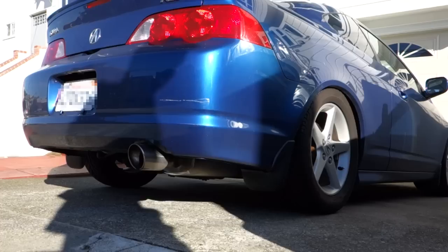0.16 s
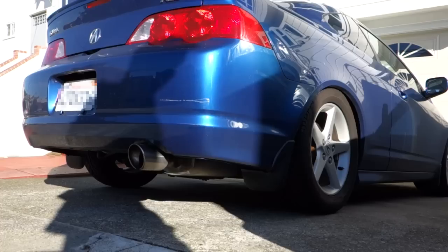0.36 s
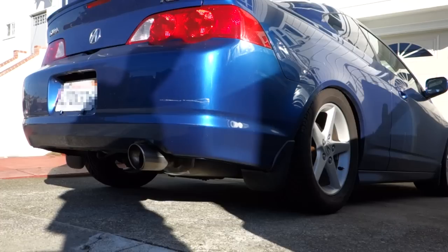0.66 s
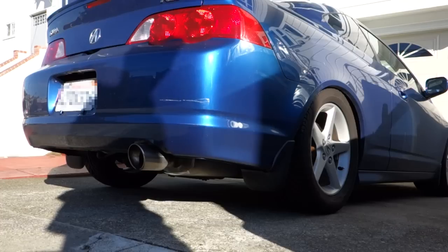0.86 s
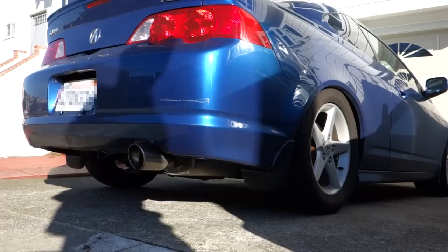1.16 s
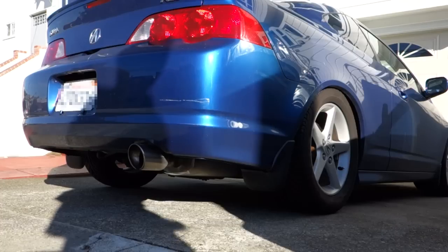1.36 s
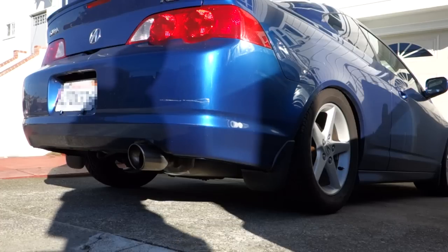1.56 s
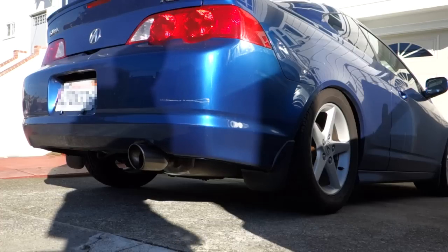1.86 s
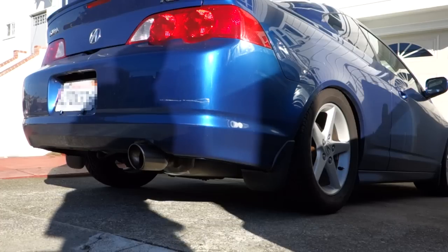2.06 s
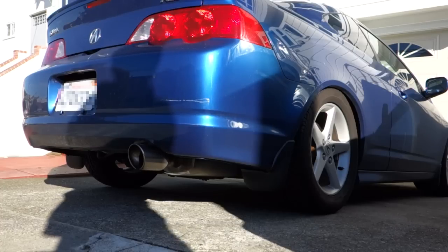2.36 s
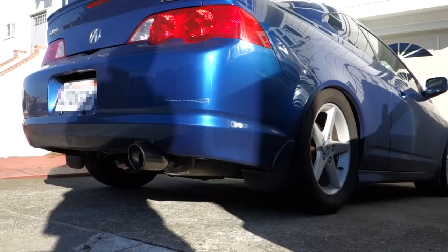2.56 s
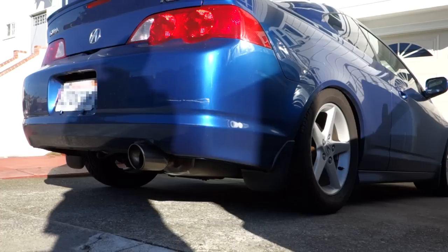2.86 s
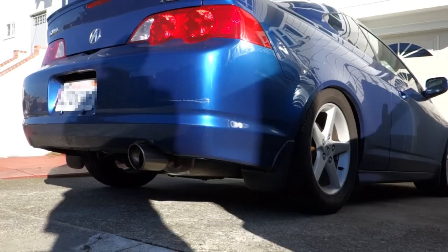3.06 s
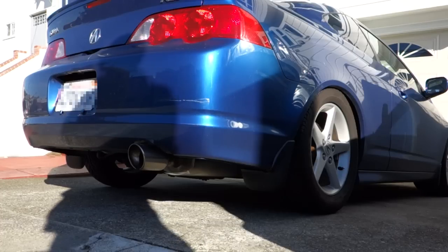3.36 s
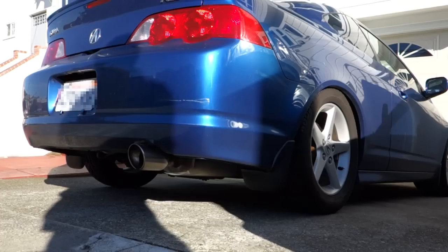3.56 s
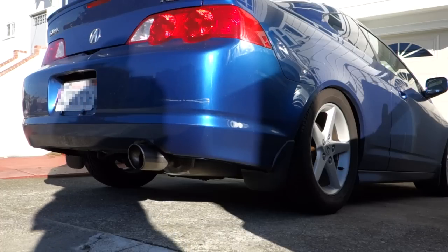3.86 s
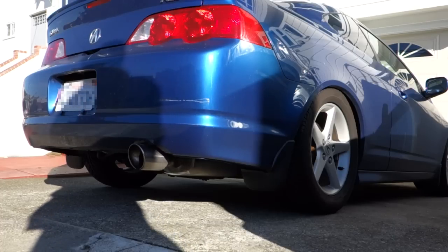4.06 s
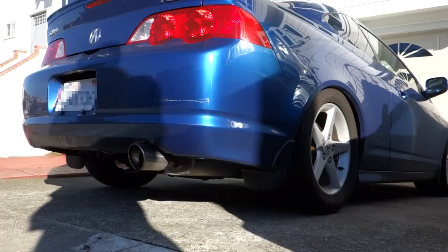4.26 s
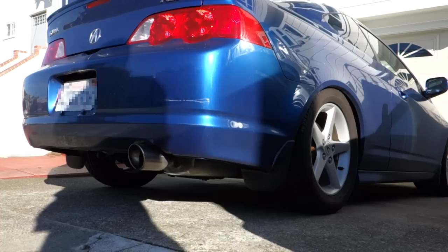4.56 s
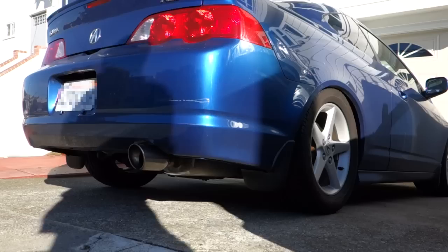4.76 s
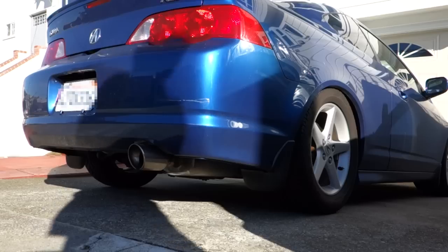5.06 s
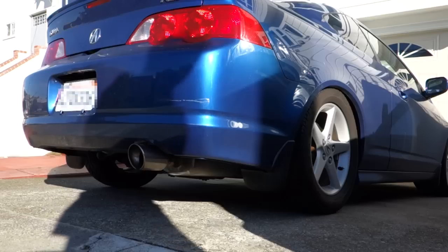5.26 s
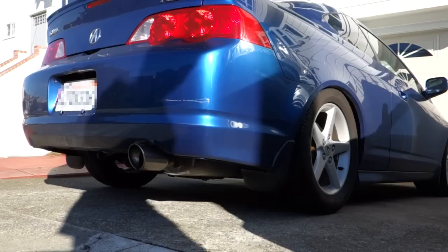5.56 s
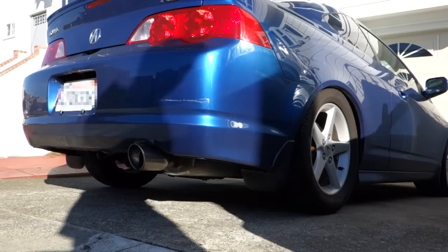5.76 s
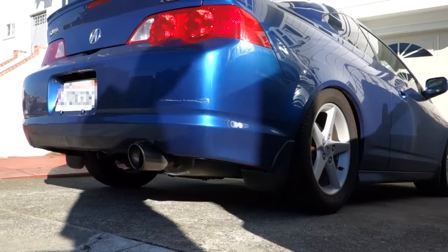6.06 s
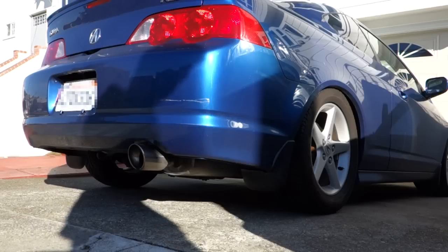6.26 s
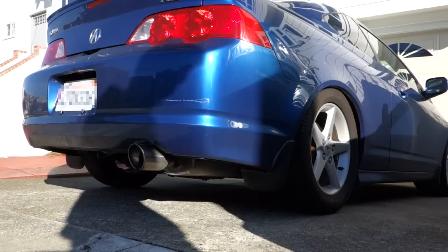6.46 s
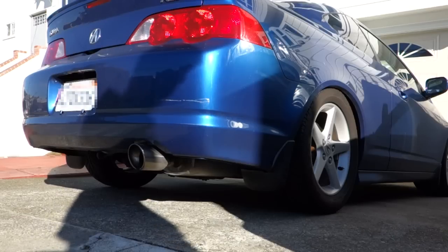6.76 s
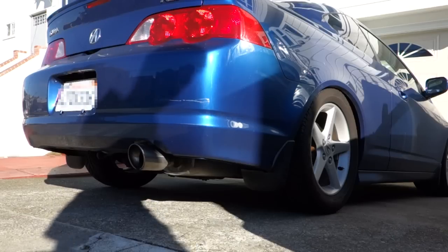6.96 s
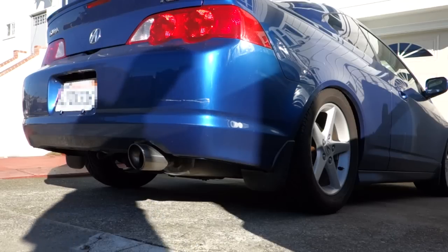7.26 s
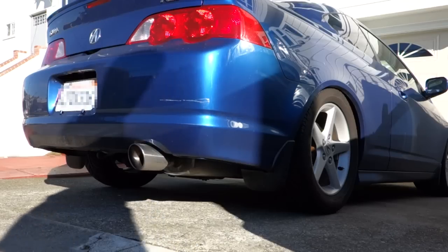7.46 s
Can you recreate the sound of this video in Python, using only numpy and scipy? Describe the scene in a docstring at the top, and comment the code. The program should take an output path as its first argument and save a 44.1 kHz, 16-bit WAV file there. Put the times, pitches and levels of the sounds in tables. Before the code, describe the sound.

Close exhaust burble outdoors jumps into one buzzy, barking rev, falls away to slow uneven throbs with tinny metal rattle, with tyre roar swelling last.

```python
"""Exhaust of an idling four-cylinder car, close behind the tailpipe: gas pulses ring the pipe once per firing.
The engine is blipped once and sags to a lumpy low idle; loose sheet metal on the exhaust rattles and buzzes.
The engine bay whirs and whines as filtered noise and shaft orders; grit cracks on the concrete in noise bursts.
Tyre roar of a car in the street, coloured noise, swells towards the end."""
import sys
import numpy as np
from scipy import signal
from scipy.fft import rfft, irfft, next_fast_len
from scipy.io import wavfile
from scipy.ndimage import uniform_filter1d, map_coordinates

SR = 44100
rng = np.random.default_rng(int(sys.argv[2]) if len(sys.argv) > 2 else 0)


def output_pcm(signal):
    """Save a mono or channel-first signal as 16-bit PCM at the path in sys.argv[1].

    Samples are clipped to [-1, 1] before scaling.
    """
    pcm = np.clip(np.atleast_2d(signal).T, -1, 1) * 32767
    wavfile.write(sys.argv[1], SR, np.round(pcm).astype(np.int16))


N = 336466

# All levels are relative: the mix adds further gains.
# engine speed: t/s, firing rate/(1/s)
FIRING_RATE = [(0, 31.39), (1.86, 29.36), (2.07, 35.06), (2.22, 48.11), (2.57, 101.18), (2.74, 101.09),
               (3.3, 72.35), (4.24, 27.48), (4.5, 26.26), (4.76, 21.06), (5.1, 18.86), (5.52, 19.32),
               (5.96, 24.69), (6.5, 23.38), (7.15, 23.11), (7.46, 21.31), (7.63, 25.13)]
# throttle, held ajar after the blip: t/s, opening/(0-1)
THROTTLE = [(1.78, 0), (1.92, 0.93), (2.54, 1), (2.62, 0.5)]
# unevenness of the burn, high at idle: t/s, roughness/(0-1)
ROUGHNESS = [(1.8, 0.9), (2.02, 0.42), (2.4, 0.32), (2.62, 0.27), (3.2, 0.23), (3.8, 0.37), (4.2, 0.63),
             (4.3, 0.79), (7.63, 0.87)]
IDLE_FIRINGS_PER_S = 31.3
LOAD_CLIMB_PER_S2 = 13  # climb of the firing rate that counts as full load

# strength of the gas pulses at the tailpipe: t/s, level/dB
PULSE_LEVEL = [(0, -20.5), (1.1, -25), (1.83, -22.5), (2.04, -13), (3.2, -13), (3.85, -17), (3.95, -19.5),
               (4.2, -20), (4.26, -31.5), (4.43, -27.5), (4.68, -32.5), (4.8, -30.5), (5.76, -34),
               (5.99, -24.5), (6.26, -29), (6.42, -28.5), (7.28, -28), (7.45, -35), (7.54, -22.5)]
# answer of the exhaust to one firing: f/Hz, level/dB
PIPE = [(12, -39), (30, 1), (55, 5), (95, 9), (135, -3), (190, -14), (235, -19), (285, -15.5), (335, -31),
        (450, -25), (510, -30.5), (585, -25), (770, -40), (1200, -79), (3000, -105)]
# turbulent gas leaving the tailpipe: f/Hz, level/dB
GUSH = [(25, -0.5), (55, -13), (95, 1.5), (150, -2.5), (200, -9.5), (250, -9), (310, -38), (600, -42)]
# orders meeting pipe resonances: firing rate/(1/s), half width/(1/s), drone swell/dB, bark swell/dB
PIPE_SWELLS = [(40.4, 2, 7, -2), (52.3, 5.3, 4.5, 1.5), (70.6, 6.4, 7, 0), (92.5, 5, 4.5, 6.5)]
# drone over boom; more under load; more again per octave of revs under load
DRONE_DB, DRONE_LOAD_DB, DRONE_LOAD_DB_PER_OCT = -11, 5.5, 4.5
# bark (sharp pulse edge) over boom; more per octave of revs; more again per octave under load
BARK_DB, BARK_DB_PER_OCT, BARK_LOAD_DB_PER_OCT = -31, 11, 8.5
# brief dulling of the pulses as the throttle drops back
LIFT_S, LIFT_WIDTH_S, LIFT_DRONE_DB, LIFT_BARK_DB = 2.622, 0.099, -2.5, -16
# rounding of slow pulses under load: cut, corner, firing rate at which it ends
SOFT_DB, SOFT_HZ, SHARP_FIRINGS_PER_S = -20, 212, 75

# ringing of the loose sheet metal: f/Hz, width/Hz, level/dB
SHEET_MODES = [(1200, 100, -6), (1446, 46, 9.5), (2775, 82, -2), (4050, 135, 0.5), (4560, 41, -7),
               (4830, 30, -0.5), (5270, 83, -4), (5540, 100, -3.5), (5900, 73, -1.5), (6040, 53, -1.5),
               (8380, 840, -17.5)]
# contact noise of the sheet metal: f/Hz, level/dB
SCRAPE = [(900, -29), (1350, 20), (1750, -12), (2900, 9.5), (3500, 2), (4100, -6), (6000, -2.5), (6700, -7),
          (7500, -28), (8600, -24), (10500, -20), (15500, -34)]
# rattle spells at low idle: start t/s, end t/s, start level/dB, end level/dB
RATTLE_SPELLS = [(4.47, 4.68, -37, -48), (4.68, 4.89, -39, -41.5), (5.66, 5.77, -51, -46),
                 (5.81, 6.08, -37, -32), (6.07, 6.185, -36.5, -48.5), (6.23, 6.28, -35.5, -37),
                 (6.4, 6.49, -33, -53), (6.49, 6.62, -37, -36), (6.661, 6.77, -27.5, -55),
                 (6.79, 7.0, -35.5, -40), (7.0, 7.31, -32, -35.5), (7.49, 7.53, -39.5, -39.5),
                 (7.57, 7.63, -26.5, -35)]
# strike point in the firing cycle at this firing rate; cycles later per extra firing per s
RATTLE_PHASE_CYCLES, RATTLE_FIRINGS_PER_S, RATTLE_SLIP_CYCLES = 0.772, 23.55, .04
RATTLE_SCATTER_DB = 1.2
RATTLE_ATTACK_S, RATTLE_HOLD_S, RATTLE_TAIL_S, RATTLE_TAIL_GAIN = .001, .01, .034, .27
# buzz ranges: firing rate/(1/s), half width/(1/s), level/dB, flutter/dB
BUZZ_RANGES = [(49.8, 4.2, -41.5, 3), (69.2, 7.24, -34, 1), (90.4, 18, -46.5, 4.5)]
# brightening of the buzz by harder contacts: f/Hz, level/dB
HARD_CONTACT = [(1400, -6.5), (2800, -3.5), (4100, -3.0), (6000, 0), (7500, 1.5), (9000, 4.5), (15000, 9)]
BUZZ_EDGE = 2.8  # abruptness of onset and stop
# full load weakens the buzz, shifts its ranges up and widens them by this share
BUZZ_LOAD_DB, BUZZ_LAG_FIRINGS_PER_S, BUZZ_WIDENING = -7.5, 6.2, 0.83

# engine bay: t/s, level/dB
BAY_LEVEL = [(0, -34.5), (1.9, -34.5), (2.25, -36.5), (2.5, -35), (2.64, -28.5), (2.9, -36), (3.1, -33.5),
             (3.6, -37.5), (4.0, -41.5), (4.4, -48), (5.0, -48), (5.6, -46.5), (6.3, -42), (7.63, -36.5)]
# whir colour: f/Hz, level/dB
WHIR = [(180, -14), (300, -4), (417, -3.5), (517, -1), (720, -7.5), (877, -10), (1030, -4), (1560, -10),
        (2040, -2.5), (2400, -12.5), (3870, -13), (5480, -22.5), (12500, -30.5), (14000, -32.5),
        (15500, -84)]
# ringing of the engine's covers: f/Hz, width/Hz, level/dB
COVERS = [(527, 40, -4), (1055, 28, -8), (1206, 71, -0.5), (1970, 36, 2), (3900, 720, -15.5)]
# chain and belt whine: multiple of the firing rate, level/dB
WHINE_ORDERS = [(17, 3.5), (34, -5), (39, -13), (63, -1.5), (68, 2)]
WHINE_DB, WHINE_WAVER_RAD = -7, 0.17

# shoe scuffing grit: start t/s, length/s, level/dB, low crunch level/dB
SCUFFS = [(0.539, .04, -29.5, -15), (0.668, .005, -24, -14), (0.734, .005, -29, -20),
          (0.794, .07, -28.5, -16), (1.002, .07, -30, -1), (2.083, .005, -26, 4), (2.12, .025, -30.5, 1.5),
          (7.359, .06, -24.5, 2.5), (7.426, .005, -36.5, 12.5)]
# colour of the snap and of the crunch: f/Hz, level/dB
SNAP = [(1500, -13), (5500, -2.5), (8000, -9.5), (15000, -12)]
CRUNCH = [(500, 0.0), (1500, -5), (4200, -10), (7000, -33), (15000, -29)]
GRAINS_PER_S, GRAIN_DB = 50, -2  # cracks after the first of a scuff; mean level against it

# car in the street: t/s, level/dB
STREET_LEVEL = [(0, -59), (4.3, -47), (5.0, -43), (5.6, -39), (6.2, -35.5), (6.8, -31.5), (7.25, -27.5),
                (7.63, -25)]
# tyre roar colour: f/Hz, level/dB
TYRES = [(30, 4.5), (90, 4), (260, 3), (400, 2.5), (650, 0), (820, -2), (1200, -3), (1550, -4.5),
         (1800, -19.5), (2600, -14), (4200, -27.5), (7000, -34.5), (15000, -42)]
# share of the street's left-right level offset: f/Hz, share/(0-1)
STREET_SIDE = [(200, 0), (700, 0.83), (1200, 1), (3000, 0.23)]
# reverberation off house fronts: f/Hz, t60/s
YARD_T60 = [(100, 0.07), (1500, 0.54), (10000, 0.056)]

# stereo likeness of the sources: f/Hz, correlation/(0-1)
LIKENESS = [(100, .995), (500, 0.93), (1500, 0.93), (4000, 0.69), (8000, 0.44), (14000, .2)]
# channel balance: f/Hz, left minus right/dB
CHANNEL_LEAN = [(60, -2), (160, -0.5), (380, 0.5), (900, 0.5), (1400, 0.5), (1750, -0.5), (2600, -3.5),
                (4000, -2.5), (6000, -0.5), (15000, 0)]
# channel phase: f/Hz, lag of left/rad
CHANNEL_LAG = [(20, .1), (100, 0.36), (400, 0.47), (900, 0.45), (1800, 0.47), (4000, 0.11), (7000, 1.1),
               (14000, 1.95)]
TOP_HZ = 15700


def amp(db):
    """Decibels to gain."""
    return np.exp(np.asarray(db) * (np.log(10) / 20))


def unit(x):
    """Scale to rms 1."""
    return x / np.sqrt(np.mean(x ** 2) + 1e-20)


def unit_band(response):
    """A response that keeps the power of white noise."""
    return response / np.sqrt(np.mean(np.abs(response) ** 2))


def along(points, hz):
    """(f/Hz, value) points read on a log axis."""
    f, v = np.transpose(points)
    return np.interp(np.log(hz + 1), np.log(f + 1), v)


def curves(rows):
    """One value per sample for each column after the time."""
    s, *cols = np.transpose(rows)
    return [np.interp(np.arange(N) / SR, s, c) for c in cols]


def bell(x, centre, width, edge=2):
    """A smooth bump of height 1; a higher edge flattens its top."""
    return np.exp(-np.abs((x - centre) / width) ** edge)


def wobble(knots_per_s):
    """A smooth random curve."""
    knots = rng.standard_normal(int(N * knots_per_s / SR) + 4)
    return map_coordinates(knots, [np.arange(N) * knots_per_s / SR])


def white():
    """Two unrelated noises."""
    return rng.standard_normal((2, N))


def filtered(x, response):
    """x times a complex response of frequency."""
    m = 2 * next_fast_len(N // 2 + SR // 4)
    return irfft(rfft(x, m) * response(np.fft.rfftfreq(m, 1 / SR)), m)[..., :N]


def below(f, hz):
    """Zero-phase low-pass gain."""
    return 1 / (1 + (f / hz) ** 8)


def causal(gain):
    """Minimum-phase response: with this gain, rings only after it is struck."""
    cepstrum = irfft(np.log(np.maximum(gain, 1e-6)))
    half = len(cepstrum) // 2
    cepstrum[1:half] *= 2
    cepstrum[half + 1:] = 0
    return np.exp(rfft(cepstrum))


def resonances(modes, f):
    """Summed response of (f/Hz, width/Hz, level/dB) modes of alternating sign."""
    total = 0
    for k, (centre, width, db) in enumerate(modes):
        damping = 1j * f * width
        total = total + (-1) ** k * amp(db) * damping / (centre * centre - f * f + damping)
    return total


def spread(pair, response):
    """Two unrelated signals become a coloured stereo pair, alike in the bass."""
    def mix(f):
        turn = np.arccos(np.clip(along(LIKENESS, f), -1, 1)) / 2
        return response(f) * np.array([np.cos(turn), np.sin(turn)])
    mid, side = filtered(pair, mix)
    return np.array([mid + side, mid - side])


def steady(x, cycles):
    """x held at rms 1, averaged over a few firings."""
    per_cycle = 2048
    grid = np.linspace(cycles[0], cycles[-1], int((cycles[-1] - cycles[0]) * per_cycle))
    power = uniform_filter1d(np.interp(grid, cycles, x * x), size=per_cycle)
    power = uniform_filter1d(power, size=2 * per_cycle)
    return x / np.sqrt(np.abs(np.interp(cycles, grid, power)) + 1e-20)


def firing_pulses(cycles, throttle, rough, scatter_db=1.4, uneven_db=2.5):
    """One impulse per firing; roughness scatters them, and with open throttle the four cylinders differ."""
    count = np.arange(1, int(cycles[-1]) + 1)
    at = np.interp(count, cycles, np.arange(N)).astype(int)
    cylinder_db = uneven_db * (rough * throttle)[at] * np.cos(np.pi * count / 2)
    scatter = scatter_db * rough[at] * rng.standard_normal(len(at))
    pulses = np.zeros(N)
    pulses[at] = amp(cylinder_db + scatter)
    return pulses


def pulse_shares(speed, load):
    """Shares of boom, drone and bark: revs and load move the power upwards; lifting off dulls the pulses."""
    octaves = np.log2(speed / IDLE_FIRINGS_PER_S)
    lift = bell(np.arange(N) / SR, LIFT_S, LIFT_WIDTH_S)
    drone_db = DRONE_DB + load * (DRONE_LOAD_DB + DRONE_LOAD_DB_PER_OCT * octaves) + LIFT_DRONE_DB * lift
    bark_db = BARK_DB + (BARK_DB_PER_OCT + BARK_LOAD_DB_PER_OCT * load) * octaves + LIFT_BARK_DB * lift
    for rate, width, drone_swell_db, bark_swell_db in PIPE_SWELLS:
        meeting = bell(speed, rate, width)
        drone_db = drone_db + drone_swell_db * meeting
        bark_db = bark_db + bark_swell_db * meeting
    drone, bark = amp(drone_db), amp(bark_db)
    return np.array([np.ones(N), drone, bark]) / np.sqrt(1 + drone ** 2 + bark ** 2)


def exhaust(cycles, throttle, load, shares, coast_db=-7, boom_hz=135, bark_hz=325, sub_hz=62, sub_db=-8):
    """One gas pulse per firing rings the pipe; pulses blur at idle and turn clean and sharp at speed."""
    rough = np.clip(curves(ROUGHNESS)[0], 0, .95)
    pulses = firing_pulses(cycles, throttle, rough)
    # eddies in the gas roughen the upper orders
    eddies = filtered(rng.standard_normal(N), lambda f: f * f / (f * f + 350 ** 2))
    eddies = eddies * np.sqrt(np.gradient(cycles))
    flutter = .3 * throttle + .7 * rough
    gas = filtered(pulses + flutter * eddies, lambda f: causal(amp(along(PIPE, f))))
    # open throttle: the pipe's main resonance outweighs the deepest bass
    gas = gas + (amp(sub_db * throttle) - 1) * filtered(gas, lambda f: below(f, sub_hz))
    # a big charge at low revs leaves as a long, round pulse
    slowness = np.clip(2.3 * (1 - np.gradient(cycles) * SR / SHARP_FIRINGS_PER_S), 0, 1)
    gas = gas + (amp(SOFT_DB * load * slowness) - 1) * filtered(gas, lambda f: 1 - below(f, SOFT_HZ))
    # top-edge cut, deepest with the throttle shut
    gas = gas + (amp(coast_db * (2 - throttle)) - 1) * filtered(gas, lambda f: 1 - below(f, 440))
    puffs = amp(3.5 * np.cos(2 * np.pi * (cycles - .3)))
    gush = filtered(rng.standard_normal(N) * puffs, lambda f: amp(along(GUSH, f)))

    def band(response, noisy):
        clean = steady(filtered(gas, response), cycles)
        blurred = unit(filtered(gush, response))
        return np.sqrt(1 - np.clip(noisy, 0, 1) ** 2) * clean + noisy * blurred
    boom = band(lambda f: below(f, boom_hz), .4 * rough ** 1.5)
    drone = band(lambda f: below(f, bark_hz) - below(f, boom_hz), rough ** 1.13)
    bark = steady(filtered(gas, lambda f: 1 - below(f, bark_hz)), cycles)
    return amp(curves(PULSE_LEVEL)[0]) * np.sum(shares * np.array([boom, drone, bark]), axis=0)


def rattles(speed, cycles):
    """(t/s, level/dB) of each sheet-metal strike: one per firing cycle while a spell lasts."""
    slip = RATTLE_SLIP_CYCLES * (speed - RATTLE_FIRINGS_PER_S)
    cycle = np.floor(cycles - RATTLE_PHASE_CYCLES - slip)
    strikes_s = np.flatnonzero(np.diff(cycle) > 0) / SR
    scatter_db = RATTLE_SCATTER_DB * rng.standard_normal(len(strikes_s))
    hits = []
    for start, end, first_db, last_db in RATTLE_SPELLS:
        for s, extra_db in zip(strikes_s, scatter_db):
            if start <= s < end:
                hits.append((s, np.interp(s, [start, end], [first_db, last_db]) + extra_db))
    return hits


def shield(speed, cycles, load, ring_db=4, panel_hz=272):
    """Loose sheet metal: contact bursts ring its modes at low idle; a brighter buzz in some rev ranges."""
    t = np.arange(SR // 12) / SR
    # fast attack, brief hold, weaker tail
    body = bell(t, 0, RATTLE_HOLD_S) + RATTLE_TAIL_GAIN * np.exp(-t / RATTLE_TAIL_S)
    burst = (1 - np.exp(-t / RATTLE_ATTACK_S)) * body
    shaking = np.zeros(N + SR)
    for s, db in rattles(speed, cycles):
        shaking[int(s * SR):][:len(t)] += amp(db + 5) * burst / burst.max()

    def sheet(f):
        mode_power = sum(np.abs(resonances([mode], f)) ** 2 for mode in SHEET_MODES)
        mode_power = mode_power / (1 + (f / 13000) ** 4)
        scrape = amp(along(SCRAPE, f) - 9)
        return unit_band(causal(np.sqrt(scrape ** 2 + amp(ring_db) ** 2 * mode_power)))
    chatter = unit(white() * amp(1.5 * wobble(900)))
    ring = spread(shaking[:N] * chatter, sheet)
    # buzz only while the revs are in one of its ranges, throbbing once per firing
    throb = unit(np.exp(-1.2 * ((cycles + 0.27) % 1)))
    flutter = wobble(40)
    sway = 0
    for rate, width, db, flutter_db in BUZZ_RANGES:
        in_range = bell(speed - BUZZ_LAG_FIRINGS_PER_S * load, rate, width * (1 + BUZZ_WIDENING * load), BUZZ_EDGE)
        sway = sway + amp(db + flutter_db * flutter) * in_range
    sway = amp(BUZZ_LOAD_DB * load) * sway
    # faster shaking makes harder contacts
    buzz = spread(sway * throb * chatter, lambda f: unit_band(sheet(f) * amp(along(HARD_CONTACT, f))))
    # each burst also flexes the whole panel in its lowest mode
    panel = spread(shaking[:N] * white(), lambda f: unit_band(resonances([(panel_hz, 65, 0)], f) ** 2))
    return ring + amp(3.5) * buzz + amp(-3) * panel


def underbody(x, echo=0.51, count=14):
    """Bounces between floor pan and concrete comb the sound finely."""
    delays_s = rng.uniform(.002, .035, count)
    bounces = sum(np.roll(x, int(d * SR), axis=-1) for d in delays_s)
    return unit(x + echo / np.sqrt(count) * bounces)


def engine_bay(cycles, load, tick_db=-0.5):
    """Valve gear whirs, ticks twice per firing and rings the covers; chain and belt whine at shaft orders."""
    ticking = amp(-tick_db * np.cos(4 * np.pi * cycles) + 1.28 * wobble(160))
    whir = unit(spread(white() * ticking, lambda f: amp(along(WHIR, f))))
    covers = unit(spread(white() * ticking * amp(1.6 * wobble(45)), lambda f: resonances(COVERS, f)))
    whine = 0
    for order, db in WHINE_ORDERS:
        phase = 2 * np.pi * order * cycles + WHINE_WAVER_RAD * wobble(12)
        whine = whine + amp(db + 2 * wobble(10)) * np.sin(phase)
    # the whine stands out only at idle
    slow = np.minimum(1, 31.5 / (np.gradient(cycles) * SR)) ** 8
    whine = amp(WHINE_DB) * slow * (1 - load) * unit(whine)
    bay = amp(-1.5) * underbody(whir) + amp(-8.0) * covers + whine
    return amp(curves(BAY_LEVEL)[0]) * bay * amp([[-.6], [.6]])


def cracks():
    """(t/s, level/dB, low crunch/dB) per grain: a scuff opens with one crack; a longer one adds more, unevenly."""
    grains = []
    for start, length, db, low_db in SCUFFS:
        grains.append((start, db, low_db))
        later = rng.uniform(-1, 1, (8, 2))[:int(length * GRAINS_PER_S)]
        for k, (late, size) in enumerate(later, 1):
            grains.append((start + (k + .4 * late) / GRAINS_PER_S, db + GRAIN_DB + 3 * size, low_db))
    return grains


def grit(life_s=0.00067, crumble=0.34, crumble_s=0.02):
    """Grains of sand crack under a shoe and crumble briefly: decaying bursts of bright and dull noise."""
    t = np.arange(SR // 12) / SR
    crack = np.exp(-t / life_s) + crumble * np.exp(-t / crumble_s)
    snap, crunch = np.zeros((2, N + SR))
    for s, db, low_db in cracks():
        snap[int(s * SR):][:len(t)] += amp(db - 5) * crack
        crunch[int(s * SR):][:len(t)] += amp(db + low_db + 1.0) * crack
    bright = spread(white() * snap[:N], lambda f: unit_band(amp(along(SNAP, f))))
    dull = spread(white() * crunch[:N], lambda f: unit_band(amp(along(CRUNCH, f))))
    return bright + dull


def yard(x):
    """House fronts answer with a short, diffuse tail: noise decaying at its own t60 per frequency."""
    hz, t, z = signal.stft(rng.standard_normal((2, SR // 3)), SR, nperseg=256)
    decay = amp(-60 * t / along(YARD_T60, hz)[:, None])
    tail = signal.istft(z * decay, SR, nperseg=256)[1]
    return signal.fftconvolve(x, tail / np.linalg.norm(tail[0]), axes=1)[:, :N]


def street(side_db=3.0):
    """Tyre roar, coloured noise, swells as a car draws near from the left."""
    roar = unit(spread(white(), lambda f: amp(along(TYRES, f))))
    roar = filtered(roar, lambda f: amp(np.outer([side_db, -side_db], along(STREET_SIDE, f))))
    return amp(curves(STREET_LEVEL)[0] + 0.69 * wobble(9)) * roar


def scene():
    """The crankshaft drives pipe, bay and rattle together."""
    speed, = curves(FIRING_RATE)
    throttle = np.clip(curves(THROTTLE)[0], 0, 1)
    # load: open throttle while the revs climb
    climb = np.gradient(uniform_filter1d(speed, size=4096)) * SR
    load = throttle * np.clip(climb / LOAD_CLIMB_PER_S2, 0, 1)
    cycles = .732 + np.cumsum(speed) / SR  # firing cycles so far
    pipe = exhaust(cycles, throttle, load, pulse_shares(speed, load))
    metal_and_grit = shield(speed, cycles, load) + grit()
    echo = amp(-9) * yard(metal_and_grit)
    return pipe + metal_and_grit + engine_bay(cycles, load) + echo + street()


def record(dry):
    """Two microphones differ in colour and phase; nothing passes above TOP_HZ."""
    def ports(f):
        lean = amp(np.outer([.5, -.5], along(CHANNEL_LEAN, f)))
        lag = np.exp(1j * np.outer([-.5, .5], along(CHANNEL_LAG, f)))
        return lean * lag * (f < TOP_HZ)
    return filtered(dry, ports)


dry = scene()
out = record(dry)
output_pcm(out)
```